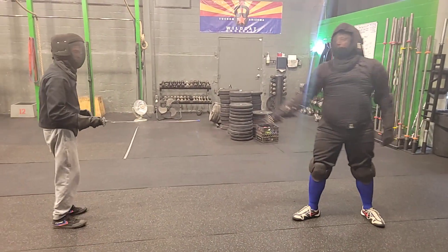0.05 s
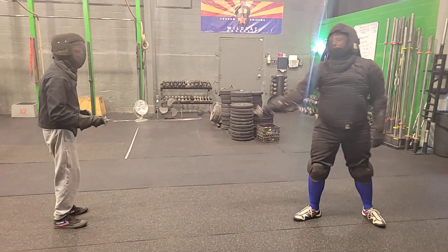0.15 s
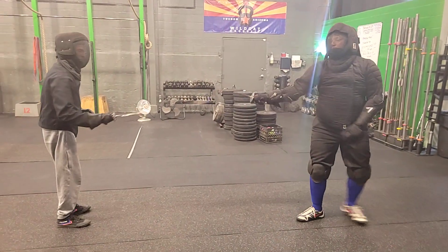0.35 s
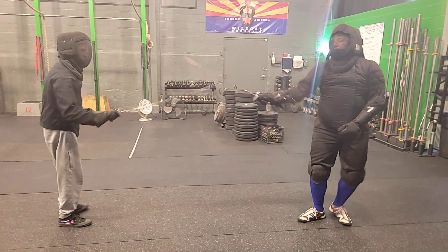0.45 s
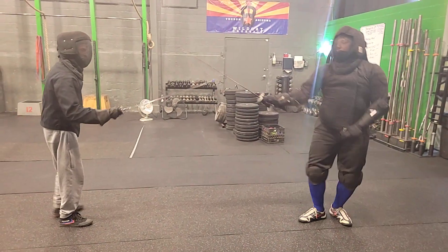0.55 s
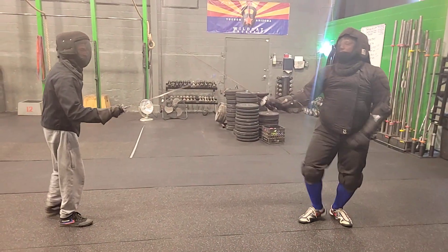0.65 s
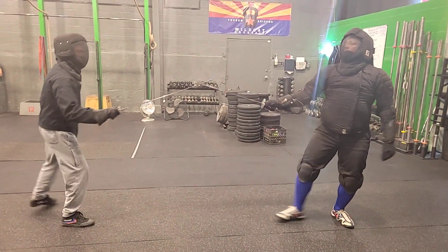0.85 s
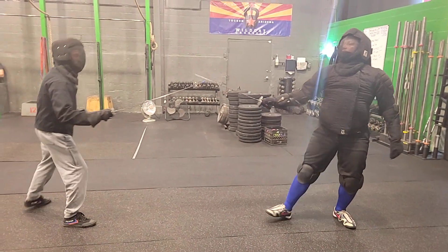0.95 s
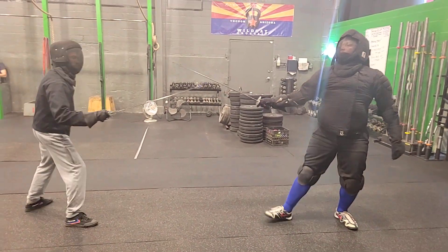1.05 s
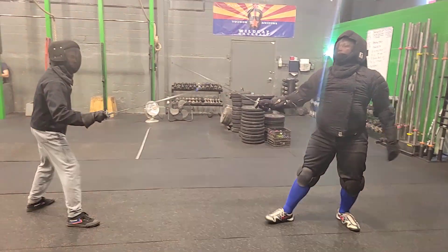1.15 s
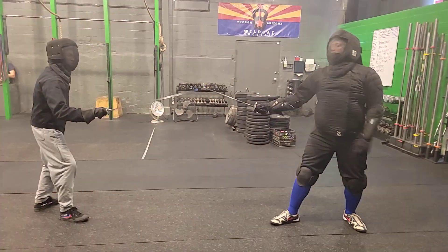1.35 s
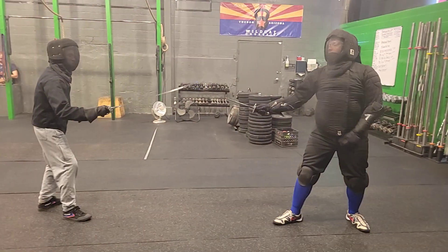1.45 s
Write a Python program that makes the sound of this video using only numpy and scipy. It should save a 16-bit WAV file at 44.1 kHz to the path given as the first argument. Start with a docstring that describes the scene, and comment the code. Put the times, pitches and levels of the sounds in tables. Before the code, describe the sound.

Thin steel blades clash sharply at about 0.2 seconds, ringing and echoing through a gym for under a second. Shoes knock softly on the rubber floor around 0.5 seconds, with a firmer step at 0.7. A blade clinks lightly at 0.9 seconds. Jackets swish faintly near 0.8 and 1.3 seconds. A low ventilation rumble and quiet room noise continue underneath.

```python
"""Fencing in a reverberant gym.

Thin steel blades meet in one sharp clash, chatter and ring on in their modes.
Later a blade gives a light clink. Shoes knock and thud on the rubber floor,
jackets swish, and ventilation rumbles underneath."""
import sys
import numpy as np
from scipy import signal
from scipy.fft import rfft, irfft, next_fast_len
from scipy.io import wavfile

SR = 44100
rng = np.random.default_rng(int(sys.argv[2]) if len(sys.argv) > 2 else 0)


def persist_wave(psi):
    """Save psi, clipped to +-1, as 16-bit WAV."""
    counts = np.round(np.clip(psi, -1, 1) * 32767).astype(np.int16)
    wavfile.write(sys.argv[1], SR, np.atleast_2d(counts).T)


N = 66150
T = np.arange(N) / SR

# hall decay: freq_hz, t60_s
GYM_DECAY = [(100, .55), (400, 0.54), (1000, 0.7), (2200, 1), (4000, 0.94), (6000, 0.56), (8500, 0.51),
             (12000, 0.38), (16000, 0.33)]
# ventilation rumble: freq_hz, gain_db
RUMBLE_SPECTRUM = [(20, -21.5), (40, -32), (55, 0), (80, 2), (130, -4), (250, -8.5), (400, -27),
                   (800, -56.5)]
# background room noise: freq_hz, gain_db
ROOM_NOISE_SPECTRUM = [(100, -2.5), (300, -3), (550, -5.5), (950, 1), (1450, -5), (2100, -7.5),
                       (3200, -14.5), (5000, -22.5), (9000, -28), (15000, -33)]
# background room noise level: time_s, level_db
ROOM_NOISE_LEVEL = [(0, -50.5), (.2, -45), (.65, -51), (1.15, -54.5), (1.5, -54)]
# jacket movements: centre_s, sigma_s, rustle_db, hiss_db
JACKET_SWISHES = [(0, 0.019, -51, -71), (0.782, 0.06, -47.5, -65), (1.341, 0.079, -52, -66.5)]
# cloth spectra: freq_hz, gain_db
RUSTLE_SPECTRUM = [(200, -15), (600, -1.5), (1100, 3.5), (1500, -8), (2100, 5.5), (3200, -5), (5000, -14.5),
                   (9000, -27.5)]
HISS_SPECTRUM = [(2000, -5), (4500, 3.5), (7000, -4), (10000, -3), (13000, -2.5), (16000, -3)]
# shoes meeting the mat: start_s, level_db, pitch_hz
SHOE_IMPACTS = [(0.1853, -29.5, 317), (.4480, -24.5, 270), (0.512, -35, 227), (.539, -36, 211),
                (0.7236, -19, 446), (0.7322, -18, 670), (0.7374, -21.5, 205), (0.7396, -20.5, 816)]
# clink ring: freq_hz, level_db, t60_s, pan_db (left minus right)
LIGHT_MODES = [(1940, -52, 0.4, -4), (2087, -47, 0.22, -15), (2235, -58, 0.14, 0), (2540, -37, 0.031, -13),
               (2740, -46.5, .25, -2), (4204, -55, .15, 0), (8489, -50.5, .04, 12)]
# clink tick spectrum, direct ring colour: freq_hz, gain_db
TICK_SPECTRUM = [(500, -13), (1400, -8), (2300, 1.5), (3600, -3.5), (7000, -4.5), (8800, 1), (11000, -2),
                 (15000, 1)]
LIGHT_DIRECT_EQ = [(2000, -5), (2560, 2.5), (4200, 6)]
# blades chattering against each other: start_s, level_db
BLADE_CONTACTS = [(.2085, -2), (.2100, -3), (.2124, -1), (.2146, 0), (.2178, -2), (.2218, -6), (.2308, -5)]
# crack spectrum, its treble beaming, direct ring colour: freq_hz, gain_db
CRACK_SPECTRUM = [(40, -44.5), (150, -19), (450, -18.5), (900, -8.5), (1500, -11), (2200, -3), (3300, -7.5),
                  (4300, -3), (6500, -2.5), (8500, -2), (10500, -5), (15000, -2)]
CRACK_DIRECT_EQ = [(600, -2.5), (2400, -4), (3300, -6), (4300, 0.5), (7000, 3), (13000, -1)]
BLADE_DIRECT_EQ = [(600, -2), (2400, -7.5), (3400, -12), (4400, -1.5), (8500, -2), (13000, -8)]
# clusters of close overtones: centre_hz, half_width_hz, direct_db, hall_db, pan_db
ZING_BANDS = [(4390, 690, -19.5, -30, -4), (8250, 600, -11.5, -24.5, 9), (13300, 160, -29, -16, 8.5)]
# ring of both blades: freq_hz, level_db, t60_s, pan_db
BLADE_MODES = [ (570, -37, .06, -2), (947, -37, .15, -3), (1076, -39, .15, -3), (1849, -33, .22, -3),
               (2190, -29, .15, -3), (2394, -22.5, .38, -3), (2712, -34, .55, -2), (3040, -33, .25, -2),
               (3333, -29, .75, -2), (3363, -25.5, .8, -2), (3665, -29, .6, -2), (3795, -33, .95, -2),
               (4140, -26, .2, -4), (4522, -26.5, .3, -3), (4680, -30, .2, -3), (5040, -29, .35, -2),
               (5232, -27, .15, -2), (5534, -28, .08, -2), (5933, -26, .3, -1), (6040, -25, .18, -1),
               (6345, -27, .35, -1), (6411, -26, .38, -1), (6933, -29, .12, 0), (7408, -25, .17, 1),
               (7714, -27, .3, 1), (7865, -24, .22, 2), (8260, -21, .22, 3), (8291, -21, .22, 3),
               (8794, -20, .16, 3), (8850, -15, .09, 5), (9390, -20, .07, 3), (10702, -27, .07, 1),
               (12628, -27, .14, 1), (13380, -21.5, .15, 2)]


def amp(db):
    return 10 ** (np.asarray(db) / 20)


def unit_rms(x):
    return x / np.sqrt(np.mean(x ** 2) + 1e-20)


def pan(db):
    """Stereo gains; positive is left."""
    return amp(np.array([[db / 2], [-db / 2]]))


def decay(start_s, t60_s):
    """Sudden onset, exponential fall."""
    return (T >= start_s) * np.exp(-np.log(1000) * np.maximum(T - start_s, 0) / t60_s)


def log_interp(points, hz):
    """Table value on a log frequency axis."""
    freqs_hz, values = np.transpose(points)
    return np.interp(np.log(hz + 1), np.log(freqs_hz + 1), values)


def filtered(x, response):
    """Apply the gain response(hz) by FFT."""
    size = next_fast_len(N + 8192)
    return irfft(rfft(x, size) * response(np.fft.rfftfreq(size, 1 / SR)), size)[..., :N]


def noise(response, mono_hz=470):
    """Stereo noise, rms 1, near mono in the bass."""
    def mid_side_gains(hz):
        angle = np.pi / 4 * (.15 + .85 * hz ** 3 / (hz ** 3 + mono_hz ** 3))
        return response(hz) * np.array([np.cos(angle), np.sin(angle)])
    mid, side = filtered(rng.standard_normal((2, N)), mid_side_gains)
    return unit_rms(np.array([mid + side, mid - side]))


def coloured(spectrum):
    return noise(lambda hz: amp(log_interp(spectrum, hz)))


def gym_response(t60_scale=1, build_s=.024, early_share=.35):
    """Echoes build up, then each frequency dies at its own rate."""
    hz, time_s, bins = signal.stft(noise(np.ones_like), SR, nperseg=256)
    t60_s = t60_scale * log_interp(GYM_DECAY, hz)[:, None]
    tail = signal.istft(bins * np.exp(-np.log(1000) * time_s / t60_s), SR, nperseg=256)[1][:, :N]
    build = early_share + (1 - early_share) * np.minimum(T / build_s, 1) ** 2
    return unit_rms(tail * build) / np.sqrt(N)


def echo(x, hall):
    return signal.fftconvolve(x, hall, axes=1)[:, :N]


def ventilation(level_db=-50.5):
    """Steady low rumble."""
    return amp(level_db) * coloured(RUMBLE_SPECTRUM)


def room_noise():
    """Background room noise, louder at the start and then settling."""
    gain = amp(np.interp(T, *np.transpose(ROOM_NOISE_LEVEL)))
    return pan(db=-2) * gain * coloured(ROOM_NOISE_SPECTRUM)


def jackets():
    """Cloth rustles and hisses as the fencers move."""
    rustle, hiss = coloured(RUSTLE_SPECTRUM), coloured(HISS_SPECTRUM)
    out = np.zeros((2, N))
    for centre_s, sigma_s, rustle_db, hiss_db in JACKET_SWISHES:
        swell = np.exp(-.5 * ((T - centre_s) / sigma_s) ** 2)
        out += swell * (amp(rustle_db) * rustle + amp(hiss_db) * hiss)
    return pan(db=-4.5) * out


def footsteps(rise_s=.00043, knock_cycles=4.72, thud_hz=149, low_hz=90, top_hz=2800, hall_low_hz=220):
    """Heel and sole give a hollow knock, low thud and small slap, dulled by the mat."""
    lowpass = lambda hz: 1 / (1 + (hz / top_hz) ** 4)
    slap_noise = noise(lowpass)
    impacts = np.zeros((2, N))
    for start_s, level_db, pitch_hz in SHOE_IMPACTS:
        age_s = T - start_s
        press = 1 - np.exp(-np.maximum(age_s, 0) / rise_s)
        knock = press * decay(start_s, knock_cycles / pitch_hz) * np.sin(2 * np.pi * pitch_hz * age_s)
        thud = amp(-8.5) * decay(start_s, t60_s=.04) * np.sin(2 * np.pi * thud_hz * age_s)
        slap = amp(-10.5) * decay(start_s, t60_s=.017) * slap_noise
        impacts += amp(level_db) * (slap - knock - thud)
    direct = filtered(impacts, lambda hz: (1j * hz / (low_hz + 1j * hz)) ** 2 * lowpass(hz))
    send = filtered(direct, lambda hz: 1j * hz / (hall_low_hz + 1j * hz))
    return direct + amp(-2.5) * echo(send, gym_response())


def steel_ring(modes, start_s, hall, direct_eq):
    """Decaying steel modes, heard directly and through the hall."""
    out = np.zeros((2, N))
    for hz, level_db, t60_s, pan_db in modes:
        phases = rng.uniform(0, 2 * np.pi, (2, 1))
        tone = decay(start_s, t60_s) * np.sin(2 * np.pi * hz * (T - start_s) + phases)
        wet = echo(tone, hall)
        wet *= np.linalg.norm(tone[0]) / np.linalg.norm(wet, axis=1, keepdims=True)  # equal energy
        direct = amp(log_interp(direct_eq, hz)) * tone
        out += amp(level_db) * pan(pan_db) * (direct + wet)
    return out


def clink(start_s=.902, t60_s=.11, rebound_s=.034, ring_lag_s=.0025):
    """A light, bright touch of steel and its weaker rebound."""
    envelope = decay(start_s, t60_s) + amp(-4) * decay(start_s + rebound_s, t60_s)
    tick = envelope * coloured(TICK_SPECTRUM)
    hall = gym_response(t60_scale=.65)  # the clink's echo is cut short
    ring = steel_ring(LIGHT_MODES, start_s + ring_lag_s, hall, LIGHT_DIRECT_EQ)
    return amp(-38) * tick + amp(-34) * echo(tick, hall) + ring


def chatter(t60_s):
    """Envelope of the blade contacts, summed in power."""
    return np.sqrt(sum((amp(db) * decay(start_s, t60_s)) ** 2 for start_s, db in BLADE_CONTACTS))


def clash():
    """Each contact cracks and zings; the blades ring on from the first."""
    crack = chatter(t60_s=.034) * coloured(CRACK_SPECTRUM)
    beamed = filtered(crack, lambda hz: amp(log_interp(CRACK_DIRECT_EQ, hz)))
    direct = amp(-13) * pan(db=-3) * beamed
    send = amp(-6) * pan(db=-2) * crack
    for centre_hz, half_width_hz, direct_db, hall_db, pan_db in ZING_BANDS:
        band = noise(lambda hz: 1 / (1 + ((hz - centre_hz) / half_width_hz) ** 2))
        zing = chatter(t60_s=.02) * band
        direct += amp(direct_db) * pan(pan_db) * zing
        send += amp(hall_db) * pan(pan_db / 2) * zing
    wet = echo(send, gym_response())
    first_contact_s = BLADE_CONTACTS[0][0]
    return direct + wet + steel_ring(BLADE_MODES, first_contact_s, gym_response(), BLADE_DIRECT_EQ)


def scene():
    return clash() + clink() + footsteps() + jackets() + ventilation() + room_noise()


def record(dry, ceiling=.8, top_hz=15900):
    """Soft peak limit, then a steep lowpass."""
    limited = dry / (1 + np.abs(dry / ceiling) ** 6) ** (1 / 6)
    return filtered(limited, lambda hz: 1 / (1 + (hz / top_hz) ** 160))


dry = scene()
out = record(dry)
persist_wave(out)
```